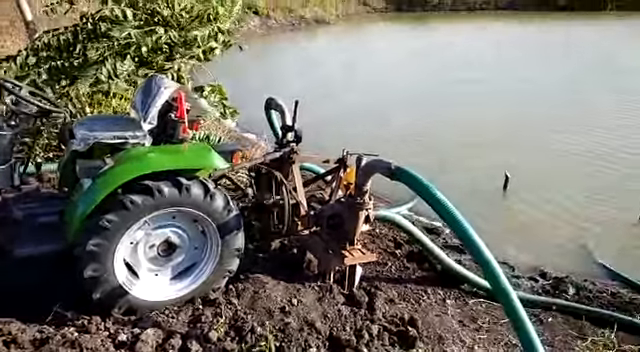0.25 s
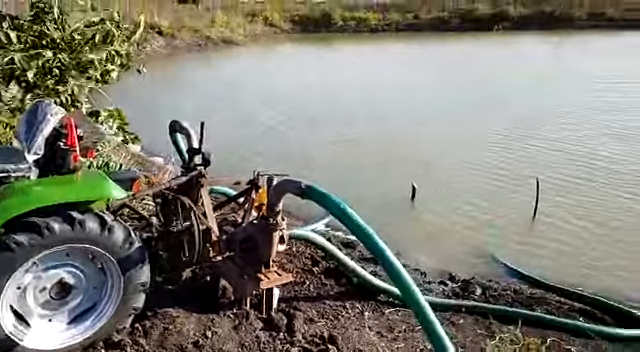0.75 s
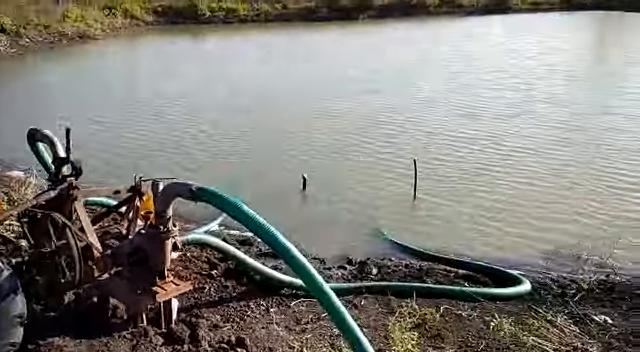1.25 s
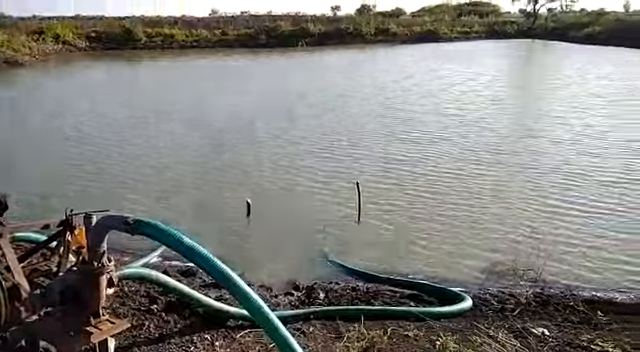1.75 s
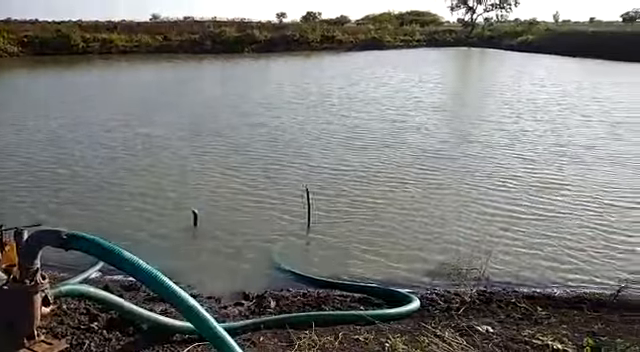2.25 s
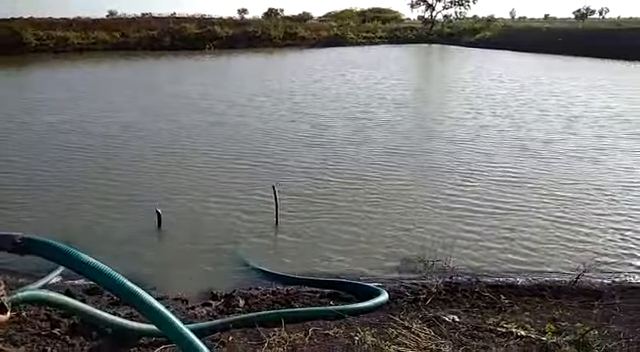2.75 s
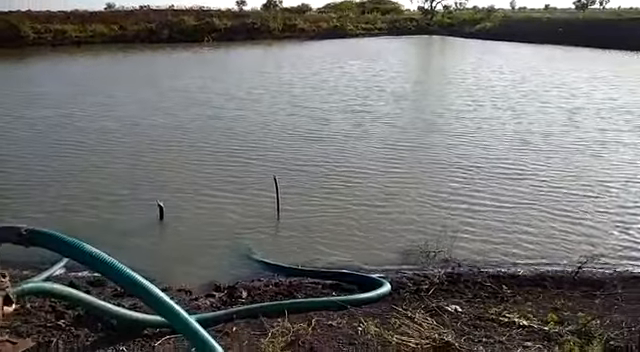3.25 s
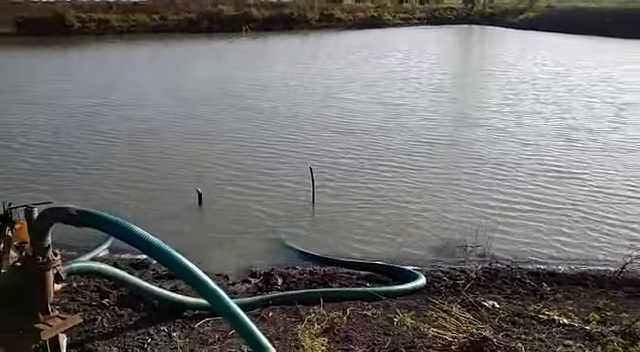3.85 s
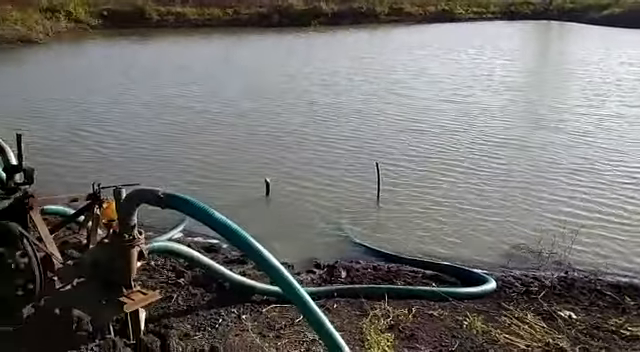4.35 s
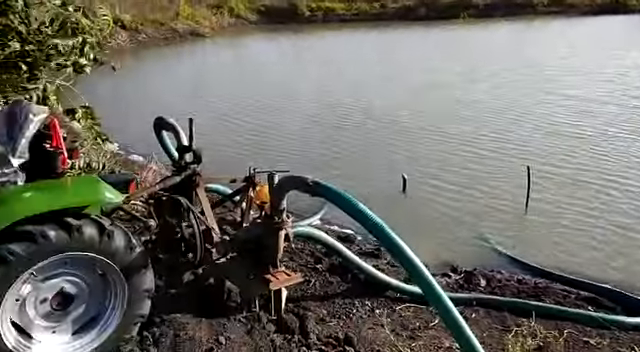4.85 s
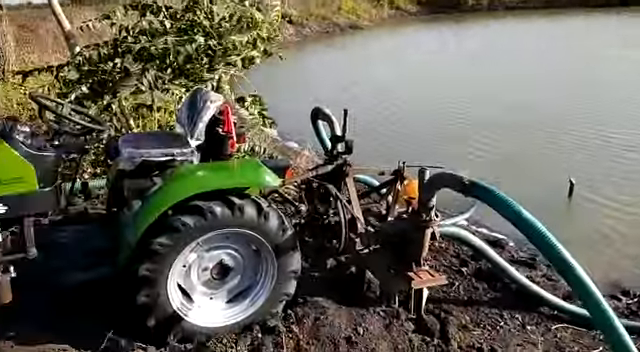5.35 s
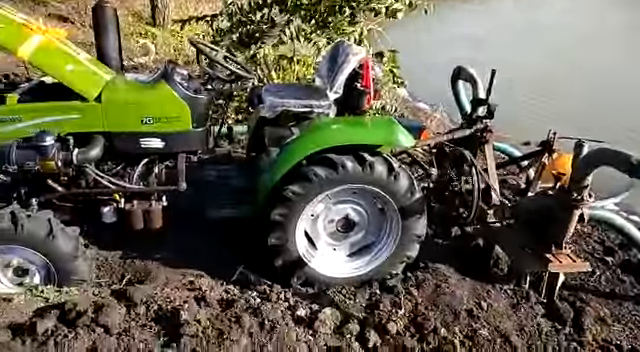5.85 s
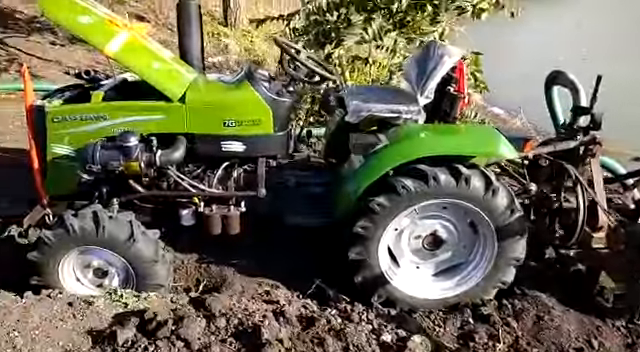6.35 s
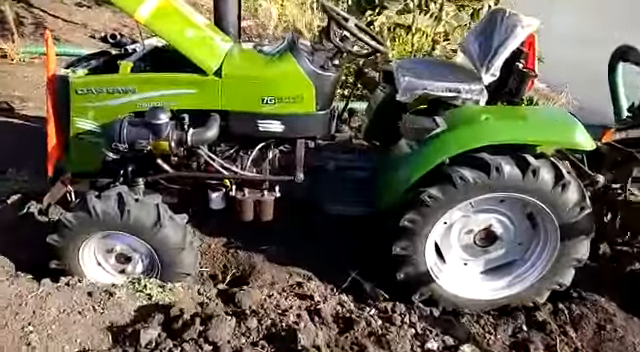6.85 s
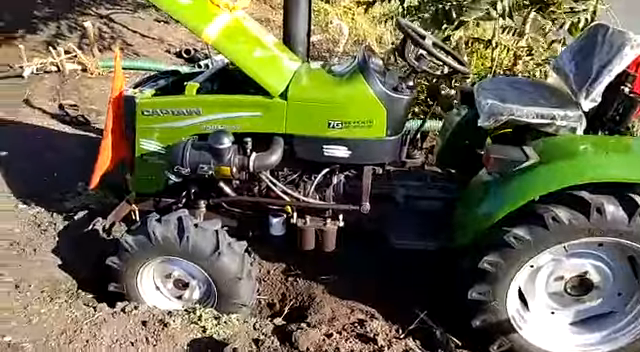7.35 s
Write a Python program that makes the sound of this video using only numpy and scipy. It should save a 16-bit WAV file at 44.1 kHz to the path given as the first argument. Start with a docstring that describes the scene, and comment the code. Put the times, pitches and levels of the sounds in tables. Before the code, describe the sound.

A small two-cylinder diesel tractor idles outdoors by a pond, driving a pump. Fast alternating strong and weak metallic knocks ride over a low exhaust throb. Wind thumps the handheld microphone, hardest in the first second, eases while it faces the water, returns midway, then again at the end as the engine sounds closer and loose tin rattles.

```python
"""A small two-cylinder diesel tractor idles beside a pond and drives a water pump, heard by a hand-held camera.
All along, noise bursts shaped by metal modes make the strong-weak knocks, and decaying tones make the exhaust throb.
First the camera faces about the pump while wind eddies, short wobbling swings, thump on its microphone ports.
Then it swings to the pond and the wind eases; it comes back to the pump with more gusts around 4.5 to 5 s.
Last it turns to the engine, where tinware rattles and gusts return. Low filtered noise lies under everything."""
import sys
import numpy as np
from scipy import signal
from scipy.fft import rfft, irfft, next_fast_len
from scipy.io import wavfile
from scipy.ndimage import uniform_filter1d

SR = 44100
rng = np.random.default_rng(int(sys.argv[2]) if len(sys.argv) > 2 else 0)


def transcribe(u):
    """Save the signal u as a 16-bit wav file named by the first command-line argument.

    u: samples, shape (n,) or (channels, n), limited to [-1, 1]; the rate is SR.
    q: integer samples, one column per channel.
    """
    v = np.clip(np.atleast_2d(u).T, -1, 1)
    q = np.round(v * 32767).astype(np.int16)
    wavfile.write(sys.argv[1], SR, q)


N = 334719  # length in samples
FIRINGS_PER_S = 16.086  # both cylinders together
EDGE_HZ = 15900  # upper limit of the sound

# How the camera is held: start_s, aim (0 pond, 1 pump, 2 engine), left_port_late_ms,
# left_right_likeness (0-1, scaled later), nearness_db (trimmed later)
CAMERA = [(0, 0.92, 0.29, 0.46, -1.1), (1, 0.51, 0.37, 0.41, 0.1), (1.6, 0.13, 0.41, 0.56, 3),
          (2.5, 0.012, 0.39, 0.77, 2), (4.0, 0.047, 0.4, 0.6, 1.55), (4.7, 0.68, 0.39, 0.42, 0.5),
          (5.2, 0.7, 0.33, 0.12, -0.6), (5.7, 1.08, 0.15, 0.65, -0.64), (6.7, 1.64, 0.12, 0.65, 1.5),
          (7.2, 1.88, 0.086, 0.54, 2), (7.59, 1.82, 0.02, 0.3, 4)]


def gain_of(db):
    """Turns decibels into a factor."""
    return 10 ** (np.asarray(db) / 20)


def evened(x):
    """Scales a signal to an rms of 1."""
    return x / np.sqrt(np.mean(x ** 2) + 1e-20)


def read(points, hz):
    """Reads a table of (pitch, value) on a log-frequency axis."""
    f, value = np.transpose(points)
    return np.interp(np.log(hz + 1), np.log(f + 1), value)


def add(mix, s, sound):
    """Mixes a sound in at second s."""
    part = mix[max(round(s * SR), 0):][:len(sound)]
    part += sound[:len(part)]


def coloured(x, points):
    """Filters the last axis by a spectrum given in dB."""
    size = next_fast_len(N)
    hz = np.fft.rfftfreq(size, 1 / SR)
    return irfft(rfft(x, size) * gain_of(read(points, hz)), size)[..., :N]


def tilted(x, db_per_octave):
    """Tilts a spectrum about 2.4 kHz; a positive slope favours the treble."""
    return coloured(x, [(300, -3 * db_per_octave), (19200, 3 * db_per_octave)])


def resonance(x, modes, extra_db):
    """Rings a sound through metal modes, each a peak with its own pitch, width and level."""
    size = next_fast_len(N)
    hz = np.fft.rfftfreq(size, 1 / SR)
    peaks = sum(gain_of(db + extra_db) * w / (w + 2j * (hz - f)) for f, w, db in modes)
    return irfft(rfft(x, size) * peaks, size)[..., :N]


def clicks_at(at, level_db):
    """Places one click of the given level at each sample number."""
    clicks = np.zeros(N)
    clicks[at] = gain_of(level_db)
    return clicks


def struck(clicks, rise_s, fall_s):
    """Envelope that rises fast and dies away after every click."""
    t = np.arange(6000) / SR
    shape = (1 - np.exp(-t / rise_s)) ** 2 * np.exp(-t / fall_s)
    return signal.oaconvolve(clicks, shape / shape.max())[:N]


def firings():
    """The two cylinders fire in turn, strong then weak, each firing a little off in time and level."""
    first_s, second_after_s, jitter_s = -0.0156, 0.0627, 0.0009
    knock_by_cylinder_db, knock_spread_db = (-33, -38), 1.5
    second_snap_db, snap_spread_db = -43.5, 2.6
    # First cylinder's injector snap as the camera turns: aim (0 pond, 1 pump, 2 engine), level_db
    snap_by_aim = [(0, -37), (.7, -29), (1.5, -34.5), (2, -39.5)]
    # Firings whose knock or snap is louder or softer than usual: time_s, extra_knock_db, extra_snap_db
    uneven_knocks = [(0.109, -1, 4), (0.232, 3.5, -6), (0.357, 1, 0.5), (0.543, 4, 8.5), (0.606, 1.5, -2),
                     (0.729, 0, 3.5), (0.854, -0.5, 5), (1.725, 3.5, -5), (1.787, 3.5, -3), (1.848, 3, 2),
                     (2.408, 3.5, 0), (2.533, 4.5, -3), (2.72, 2.5, 2), (3.339, 3.5, -2), (3.59, 2, -9),
                     (3.714, 1.5, -1), (4.646, 2, 2), (4.958, 0, 2.5), (5.577, 5.5, 2), (6.263, 4, 3),
                     (6.45, 4, 5), (6.573, -1, 7.5), (6.696, 0, 6), (6.822, 3, 6), (6.947, -3.5, 9),
                     (7.068, -2.5, 5), (7.32, 0, 7), (7.443, -3, 5)]

    k = np.arange(int(N / SR * FIRINGS_PER_S) + 2)
    second = k % 2
    late, knock, snap = rng.standard_normal((3, len(k)))
    s = first_s + k // 2 * 2 / FIRINGS_PER_S + second * second_after_s
    aim = np.interp(s, *np.transpose(CAMERA)[:2])
    first_snap_db = np.interp(aim, *np.transpose(snap_by_aim))
    knock_db = np.take(knock_by_cylinder_db, second) + knock_spread_db * knock
    snap_db = np.where(second, second_snap_db, first_snap_db) + snap_spread_db * snap
    for when, more_knock_db, more_snap_db in uneven_knocks:
        # The nearest firing gets the listed extra in place of its random spread
        near = np.argmin(abs(s - when))
        knock_db[near] += more_knock_db - knock_spread_db * knock[near]
        snap_db[near] += more_snap_db - snap_spread_db * snap[near]
    at = ((s + jitter_s * late) * SR).astype(int)
    heard = (at >= 0) & (at < N)
    return at[heard], second[heard] == 1, knock_db[heard], snap_db[heard]


def injector_snaps(noise, rattle, at, second, snap_db):
    """Each injector snap is a burst of bright noise with an even shorter, brighter spit at its start."""
    # Colour of the snap: pitch_hz, gain_db
    snap_colour = [(1500, -50), (4000, -8.5), (8000, 4), (15000, 3)]
    # Colour of the spit: pitch_hz, gain_db
    spit_colour = [(4000, -21), (8000, -9.5), (12000, 8.5), (15000, 15)]
    early = -80  # samples
    snaps = np.roll(clicks_at(at, snap_db), early)
    # The second cylinder spits brighter than it snaps
    spits = np.roll(clicks_at(at, snap_db + 7 * second), early)
    snap = coloured(noise * struck(snaps, 0.0019, 0.014), snap_colour)
    spit = coloured(noise[::-1] * rattle * struck(spits, 0.00054, 0.0045), spit_colour)
    return gain_of(-3.0) * snap + gain_of(2.0) * spit


def knock_cracks(noise, knocks):
    """Combustion hammers the block with noise for a moment before it dies."""
    hold_s = 0.01
    blows = struck(np.roll(knocks, 110), 0.00046, 0.0035)
    blows = uniform_filter1d(blows, size=round(hold_s * SR))
    return tilted(noise * blows, -1.0) * gain_of(6.0)


def clangs(at, knock_db):
    """Every knock rings a fresh handful of dying metal modes, most of them low, in each strand."""
    low_hz, high_hz, t60_s = 1653, 4798, 0.09  # t60: time to fall by 60 dB
    below_knock_db, spread_db = -9, 4
    t, out = np.arange(4000) / SR, np.zeros((3, N))
    rise = (1 - np.exp(-t / 0.0015)) ** 2
    for sample, level_db in zip(at, knock_db):
        place, phase = rng.random((2, 3, 24, 1))
        hz = low_hz * (high_hz / low_hz) ** place ** 1.3
        size_db = level_db + below_knock_db + spread_db * rng.standard_normal(hz.shape)
        modes = gain_of(size_db - 60 * t / t60_s) * np.sin(2 * np.pi * (hz * t + phase))
        for strand, ring in zip(out, modes.sum(1) * rise / np.sqrt(12)):
            add(strand, sample / SR, ring)
    return out


def gas_hiss(noise, rattle, at, snap_db):
    """A valve opens between two firings and lets out a bright hiss of gas."""
    after_s = 0.021
    # The hiss follows the snap level only about half as strongly
    level_db = 0.52 * snap_db - 31 + 2 * rng.standard_normal(len(at))
    valves = np.roll(clicks_at(at, level_db), round(after_s * SR))
    return tilted(noise * rattle * struck(valves, 0.0037, 0.017), 6.1)


def ticks(noise, at, second):
    """A dry tick, a very short noise burst, rides on the second cylinder's knock."""
    after_s = 0.0044
    # Colour of the tick: pitch_hz, gain_db
    tick_colour = [(500, -12), (1000, -2), (2500, 5.5), (4200, -51), (15000, -35)]
    level_db = -36.5 + 1.2 * rng.standard_normal(second.sum())
    clicks = np.roll(clicks_at(at[second], level_db), round(after_s * SR))
    return coloured(noise * struck(clicks, 0.00027, 0.0032), tick_colour)


def valve_clacks(noise, at):
    """A dull valve clack, a low noise burst of varied strength, falls between two firings."""
    after_s = 0.0257
    # Colour of the clack: pitch_hz, gain_db
    clack_colour = [(400, -19), (800, 6), (1400, 6.5), (2500, -32), (6000, -40)]
    level_db = -42 + 5.7 * rng.standard_normal(len(at))
    clicks = np.roll(clicks_at(at, level_db), round(after_s * SR))
    return coloured(noise * struck(clicks, 0.0027, 0.0039), clack_colour)


def tin_rattle(noise, knocks):
    """Knocks shake the loose tinware, heard as the camera turns to the engine; some shakes come by themselves."""
    buzz_db, heard_from_aim = -10.5, 1.15  # aim: 1 pump, 2 engine
    # Tinware shaking close by: time_s, level_db (of the shake, before the modes)
    rattles = [(7.04, -35.5), (7.065, -44), (7.239, -43), (7.531, -35.5)]
    # Modes of the loose tinware: pitch_hz, width_hz, level_db (raised below)
    tin_modes = [(1370, 60, 6), (1780, 90, 2), (2050, 110, 2), (3280, 53, -3), (3640, 56, 2.5),
                 (5160, 59, -6)]
    aim = np.interp(np.arange(N) / SR, *np.transpose(CAMERA)[:2])
    facing = np.clip((aim - heard_from_aim) / (2 - heard_from_aim), 0, 1)
    shakes = knocks * gain_of(buzz_db) * facing
    for s, level_db in rattles:
        shakes[round(s * SR)] += gain_of(level_db)
    return resonance(noise * struck(shakes, 0.0051, 0.012), tin_modes, extra_db=11)


def engine_metal():
    """Three strands of noise bursts for the blows of the engine ring through the block; tinware joins in."""
    # Modes of engine block and tinware: pitch_hz, width_hz, level_db over the broad colour
    block_modes = [(669.6, 12, -2), (935, 4.6, 6), (1086, 9, 1), (1390, 16, -1.5), (2305, 19, -2.5),
                   (2856, 71, -3), (3310, 186, 3.5), (3537, 45, 6), (5187, 140, 5.5)]
    at, second, knock_db, snap_db = firings()
    knocks = clicks_at(at, knock_db)
    snap, crack, ring, gas, clatter = rng.standard_normal((5, 3, N))
    # Play in the joints makes the level flutter
    play = evened(uniform_filter1d(rng.standard_normal(N), 60))
    rattle = evened(gain_of(1.27 * play))

    metal = injector_snaps(snap, rattle, at, second, snap_db)
    metal += knock_cracks(crack, knocks)
    metal += tilted(ring * struck(knocks, 0.004, 0.02), -0.19) * gain_of(-6.5)
    metal += clangs(at, knock_db)
    metal += gas_hiss(gas, rattle, at, snap_db)
    # Reversing the order of the strands gives each a different noise, except the middle one
    metal += ticks(crack[::-1], at, second)
    metal += valve_clacks(gas[::-1], at)
    metal += tilted(clatter * rattle, -4.0) * gain_of(-42.5)  # steady gear clatter
    return metal + resonance(metal, block_modes, extra_db=0) + tin_rattle(ring[::-1], knocks)


def at_ports(strands):
    """The camera's aim sets delay, likeness and colour of the engine at the two ports."""
    # Colour of the engine: pitch_hz, then pond_left_db, pond_right_db, pump_left_db, pump_right_db,
    # engine_left_db, engine_right_db for a camera aimed there
    colour = [(484, -9, -9, -1.5, -34, -27, -4), (692, -3, -7.5, -20.5, 7.5, 8.5, 4),
              (837, -7, -5, 4.5, 5.5, 1.5, -4.5), (1286, -5.5, 3.1, 1.5, -5, -12.5, 2),
              (1297, -3.5, -6, -3, 2, -11, 5), (1833, 4, 2.5, -1, 5.5, -4.5, 2),
              (2940, 2.5, -3, 3.5, 4.5, 2.5, -6.5), (2940, 0, -1.5, -1, 1, 5.5, -15),
              (4310, -3.5, -1, -3, -7, -9, 10), (4690, -9, -2, -18.5, -12, -7, 9.5),
              (5630, -2.5, -13, -3, -11.5, -1, -1.5), (6580, -16.5, -7, -10, -5.5, -12, 3),
              (8910, -16.5, -13.5, -4.5, -6, -13.5, -11.5), (10100, -18.5, -19, -13.5, -18.5, -20.5, -21),
              (14600, -39, -33, -25, -37, -19, -27)]
    frame = 512  # samples
    alike_to_hz = 3490  # above this the ports hear different parts of the engine
    hz, t, spectra = signal.stft(strands, SR, nperseg=frame, noverlap=frame * 3 // 4)
    shared, own_left, own_right = spectra
    hz = hz[:, None]
    s, *columns = np.transpose(CAMERA)
    aim, late_ms, alike, near_db = (np.interp(t, s, c) for c in columns)

    alike = np.clip(1.55 * alike / (1 + (hz / alike_to_hz) ** 4), 0, 1)
    left = shared * np.exp(-2j * np.pi * hz * late_ms / 1000)
    pair = np.sqrt(alike) * np.array([left, shared])
    pair += np.sqrt(1 - alike) * np.array([own_left, own_right])

    f, *shades = np.transpose(colour)
    shades = np.array([read(np.transpose([f, c]), hz[:, 0]) for c in shades]).reshape(3, 2, -1, 1)
    # Blend the colours of the two nearest aims
    weights = np.clip(1 - abs(np.clip(aim, 0, 2) - np.arange(3)[:, None]), 0, 1)[:, None, None]
    low_cut = hz ** 2 / (hz ** 2 + 350 ** 2)

    # The colour varies at random in patches of time and pitch, stronger in the treble
    patches = rng.standard_normal(shared.shape)
    patches = uniform_filter1d(uniform_filter1d(patches, 7, axis=0), 9, axis=1)
    patches = patches - uniform_filter1d(patches, 30, axis=0)
    patchy_db = (0.7 + 4.5 * hz / EDGE_HZ) * evened(patches)
    pair *= gain_of((shades * weights).sum(0) + near_db + 4.5 + patchy_db) * low_cut
    return signal.istft(pair, SR, nperseg=frame, noverlap=frame * 3 // 4)[1][:, :N]


def exhaust():
    """Each exhaust valve opening, and the intake gulp after it, kicks the dying pipe modes a little differently."""
    # Modes of exhaust pipe and silencer: pitch_hz, width_hz, level_db
    pipe_modes = [(67.6, 11.5, -28.5), (92, 15.5, -27.5), (179.8, 9.5, -40), (238.6, 5.7, -41),
                  (306.8, 22.3, -33.5)]
    # Loudness of the exhaust: time_s, left_db, right_db
    throb = [(0, -6, -7.5), (1.5, -6, -3), (3, -11.5, -7.5), (4.5, -7, -3), (5.5, -7.5, -2), (6.3, -8, -4),
             (6.8, -5, 0.5), (7.59, -1, 2.5)]
    first_puff_s, gulp_after_s, gulp_db = 0.0218, 0.027, -7
    lead_s = 0.5  # room for kicks that begin before the start
    starts = first_puff_s + np.arange(-2, 122) / FIRINGS_PER_S
    t, out = np.arange(6000) / SR, np.zeros(N + SR)
    chance = rng.standard_normal((len(starts), len(pipe_modes), 2))
    hz, width, db = np.transpose(pipe_modes)[:, :, None]
    for k, start in enumerate(starts):
        # The two cylinders are slightly unequal
        size_db = db + 2.0 * chance[k, :, :1] + 0.15 * (-1) ** k
        swing = np.sin(2 * np.pi * hz * t + 0.38 * chance[k, :, 1:])
        modes = gain_of(size_db) * np.exp(-np.pi * width * t) * swing
        kick = modes.sum(0) * (1 - np.exp(-t / 0.0011))
        add(out, start + lead_s, kick)
        add(out, start + lead_s + gulp_after_s, gain_of(gulp_db) * kick)
    s, *ports_db = np.transpose(throb)
    levels_db = [np.interp(np.arange(N) / SR, s, p) for p in ports_db]
    return out[SR // 2:][:N] * gain_of(levels_db)


def band(x, order, low_hz, high_hz):
    """Keeps only the pitches between two edges."""
    return signal.sosfilt(signal.butter(order, [low_hz, high_hz], "bandpass", fs=SR, output="sos"), x)


def puff(length, level_db, hz):
    """An eddy swings the membrane once or twice, with some hiss; a weak stir and slow shove surround it."""
    t = np.arange(-length - .03, length + .03, 1 / SR)
    wander, hiss, shove = rng.standard_normal((3, len(t)))
    wander = evened(uniform_filter1d(uniform_filter1d(wander, 220), 220))
    # Faster air sheds smaller eddies, so a harder puff hisses higher
    top_hz = max(576 + 25 * (level_db + 20.0), 1.23 * hz)
    turns = np.cumsum(hz * 1.05 * np.exp(0.23 * wander)) / SR
    phase = 2 * np.pi * (turns - turns[len(t) // 2]) + 0.87 * rng.standard_normal()
    swing = np.sqrt(2) * rng.choice([-1, 1]) * np.cos(phase)
    hiss = evened(band(hiss, 3, hz, top_hz))
    shove = evened(band(shove, 2, 48, 95))
    core = np.exp(-(t / (0.56 * length)) ** 2)
    stir = np.hanning(len(t)) * (gain_of(-14.5) * swing + gain_of(-7.5) * shove)
    return gain_of(level_db) * (core * (swing + gain_of(-11.0) * hiss) + stir)


def eddies(start, end, level_db, hz, port):
    """A gust sheds small eddies at an uneven pace, each with its own size and pitch."""
    gap_s, turns, spread_db, pitch_spread = 0.022, 1.6, -1, 0.32
    count = max(round((end - start) / gap_s), 1)
    s = np.linspace(start, end, count, endpoint=False)
    late, longer, louder, higher = rng.uniform(-0.988, 1, (4, count))
    return np.transpose([s + 0.253 * gap_s * late,
                         turns / hz * (1 + 0.352 * longer),
                         level_db - 4 + spread_db * louder,
                         hz * np.exp(pitch_spread * higher),
                         port + 0 * s])


def buffet(start, end, level_db, hz):
    """The heavy, unbroken rumble of a gust, with a froth of finer turbulence on top."""
    rumble_db, froth_db, froth_top_hz = -3.5, -14.5, 800
    low_hz, high_hz = 0.45 * hz, 1.49 * hz
    t = np.arange(0, end - start + 0.047, 1 / SR)
    settle = 2000  # samples dropped while the filters settle
    low, high = rng.standard_normal((2, len(t) + settle))
    low = evened(band(low, 2, low_hz, high_hz)[settle:])
    high = evened(band(high, 1, high_hz, froth_top_hz)[settle:])
    fade = np.clip(np.minimum(t, t[-1] - t) / 0.034, 0, 1)
    return gain_of(level_db) * fade * (gain_of(rumble_db) * low + gain_of(froth_db) * high)


def wind():
    """Each eddy lands on one port; the membrane's limited swing rounds off the loudest peaks."""
    # Eddies placed one by one, loud and soft: start_s, length_s, level_db, pitch_hz (varied in the puff),
    # port (0 left, 1 right)
    single_eddies = [(0.094, 0.008, -22.5, 327, 1), (0.239, 0.0046, -20, 237, 1),
                     (0.389, 0.0051, -12, 286, 0), (0.402, 0.0054, -9, 173, 0),
                     (0.438, 0.0069, -21.5, 155, 0), (0.462, 0.005, -23, 156, 0),
                     (0.487, 0.0078, -25, 133, 0), (0.58, 0.025, -21, 120, 0), (0.633, 0.0039, -21, 196, 0),
                     (0.779, 0.009, -18, 114, 0), (0.8, 0.0084, -11.5, 143, 0),
                     (0.815, 0.0094, -7.5, 124, 0), (0.836, 0.005, -12, 253, 0), (0.85, 0.014, -9, 227, 0),
                     (0.881, 0.012, -6, 236, 0), (0.897, 0.019, -9.5, 208, 0), (0.917, 0.0047, -12, 233, 0),
                     (0.935, 0.0054, -14, 218, 0), (0.971, 0.011, -8.5, 161, 0),
                     (0.986, 0.0062, -6, 187, 0), (1.069, 0.005, -18.5, 125, 0), (1.09, 0.007, -20, 212, 0),
                     (1.167, 0.008, -22.5, 122, 0), (1.248, 0.013, -18.5, 214, 0),
                     (1.282, 0.012, -16.5, 116, 0), (1.296, 0.0088, -26, 194, 0),
                     (1.331, 0.01, -11, 136, 0), (1.351, 0.019, -23, 248, 0), (1.37, 0.0075, -27, 172, 0),
                     (1.386, 0.014, -14.5, 110, 0), (1.436, 0.026, -21, 244, 0),
                     (1.511, 0.0059, -21.5, 171, 0), (1.525, 0.0086, -18.5, 253, 0),
                     (1.535, 0.022, -17.5, 203, 0), (2.61, 0.0081, -26.5, 298, 0),
                     (2.748, 0.011, -26, 330, 0), (3.755, 0.0076, -27, 207, 0),
                     (3.771, 0.014, -26.0, 226, 0), (3.791, 0.0047, -20.0, 250, 0),
                     (3.827, 0.0041, -24.5, 302, 0), (3.844, 0.013, -24, 290, 0),
                     (3.859, 0.005, -30, 297.6, 0), (4.045, 0.015, -26.5, 319, 0),
                     (4.337, 0.0062, -22.5, 210, 0), (4.458, 0.0092, -16, 247, 0),
                     (4.497, 0.0092, -19.5, 149, 0), (4.513, 0.0068, -15.5, 182, 0),
                     (4.524, 0.0053, -22, 137, 0), (4.606, 0.0075, -22, 129, 0),
                     (4.658, 0.017, -23, 161, 0), (4.754, 0.013, -27, 74, 0), (4.882, 0.023, -22, 70, 0),
                     (5.064, 0.012, -24, 84.4, 0), (4.983, 0.0067, -18, 171, 0),
                     (5.021, 0.0078, -19, 171, 0), (6.894, 0.0091, -27.5, 257, 0),
                     (7.165, 0.01, -22, 170, 0), (7.192, 0.0069, -23.5, 333, 0),
                     (7.231, 0.011, -19, 181, 0), (7.273, 0.014, -20, 245, 0), (7.291, 0.0081, -21, 139, 0),
                     (7.314, 0.013, -18, 144, 0), (7.339, 0.0071, -22.5, 218, 0),
                     (7.347, 0.0072, -26, 181, 1), (7.36, 0.0084, -19, 123, 1),
                     (7.377, 0.0084, -23, 187, 1), (7.47, 0.011, -22.5, 182, 0)]
    # Gusts that shed runs of small eddies: start_s, end_s, level_db (trimmed later),
    # typical_pitch_hz, port (0 left, 1 right)
    gusts = [(0.156, 0.716, -36, 97.6, 1), (0.417, 0.739, -26.5, 129.6, 0), (1.121, 1.217, -23, 103.8, 0),
             (2.594, 2.914, -38.5, 270, 0), (3.797, 3.971, -33, 210, 0), (4.536, 4.767, -24.5, 90.9, 0),
             (4.865, 4.963, -27, 86.7, 0), (5.045, 5.123, -32, 104, 0), (6.658, 7.009, -36.5, 79.3, 1),
             (6.882, 7.047, -33, 242, 0), (7.158, 7.3, -35, 132, 1), (7.379, 7.511, -27.5, 104.6, 1),
             (7.359, 7.542, -28.5, 129, 0), (1.245, 1.609, -28, 177, 0), (0.775, 1.0, -19.5, 151, 0),
             (3.873, 3.895, -30, 80.3, 0), (4.065, 4.105, -36.5, 307, 0), (4.445, 4.529, -23.5, 218, 0),
             (4.97, 5.042, -23.5, 127.6, 0), (7.151, 7.36, -26, 262, 0), (2.829, 2.897, -33.5, 317, 0)]
    out = np.zeros((2, N))
    all_eddies = np.vstack([single_eddies] + [eddies(*gust) for gust in gusts])
    for s, length, level_db, hz, port in all_eddies:
        add(out[round(port)], s - length / 2 - .03, puff(length, level_db, hz))
    for start, end, level_db, hz, port in gusts:
        add(out[port], start - .02, buffet(start, end, level_db, hz))
    out = .95 * np.tanh(out / .95)
    return signal.sosfilt(signal.butter(3, 900, fs=SR, output="sos"), out)


def low_background():
    """Steady low background noise, largely shared by the ports."""
    # Colour of the background: pitch_hz, gain_db
    low_colour = [(30, -30), (50, -45), (70, 2), (120, 0.5), (250, -7), (400, -4.5), (600, -26.5),
                  (1000, -31)]
    shared, left, right = rng.standard_normal((3, N))
    noise = np.array([left, right]) + 1.25 * shared
    return gain_of(-46) * evened(coloured(noise, low_colour))


def scene():
    """Adds engine, exhaust, wind and low background noise at the two ports."""
    return at_ports(engine_metal()) + exhaust() + wind() + low_background()


def record(dry):
    """The microphone cuts the deep bass, then a filter removes the highest treble."""
    cut = signal.sosfilt(signal.butter(3, 44, "highpass", fs=SR, output="sos"), dry)
    treble_limit = signal.firwin(301, EDGE_HZ, window=("kaiser", 9), fs=SR)
    return signal.oaconvolve(cut, treble_limit[None], "same")


dry = scene()
out = record(dry)
transcribe(out)
```